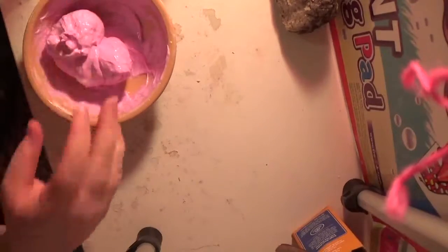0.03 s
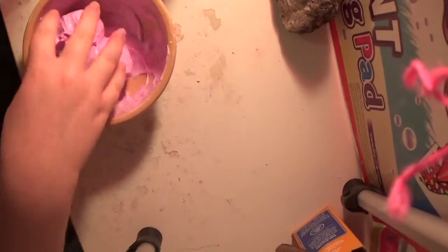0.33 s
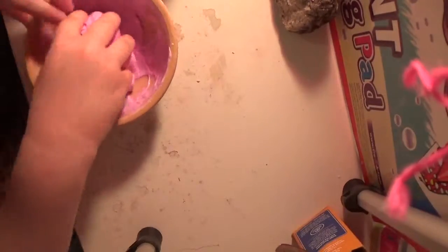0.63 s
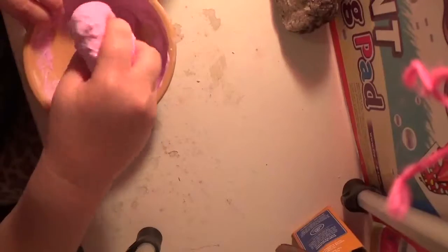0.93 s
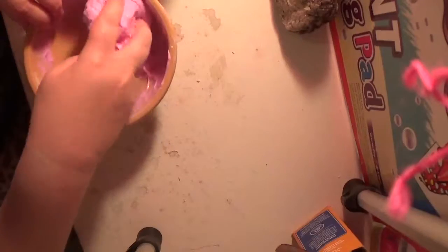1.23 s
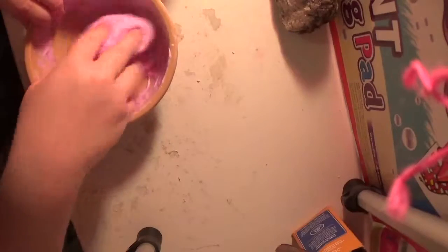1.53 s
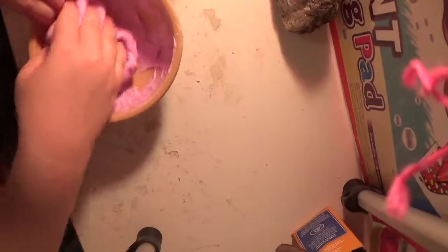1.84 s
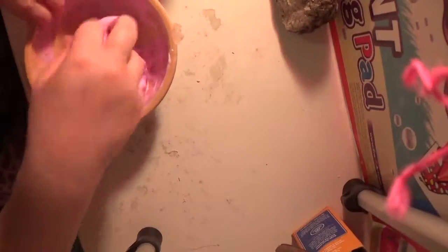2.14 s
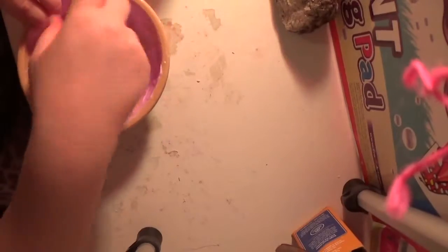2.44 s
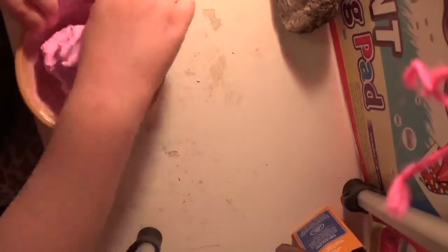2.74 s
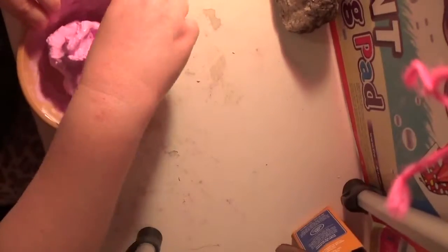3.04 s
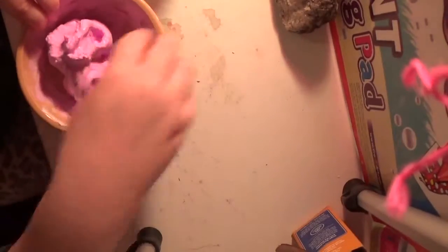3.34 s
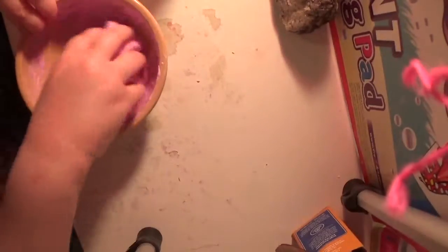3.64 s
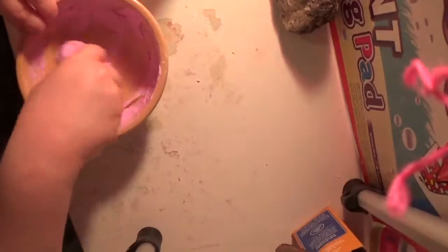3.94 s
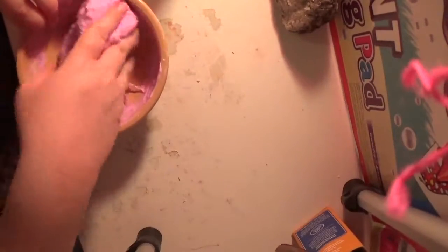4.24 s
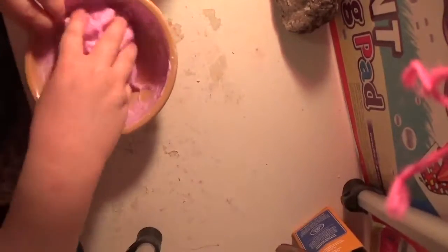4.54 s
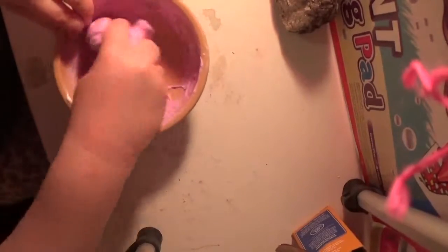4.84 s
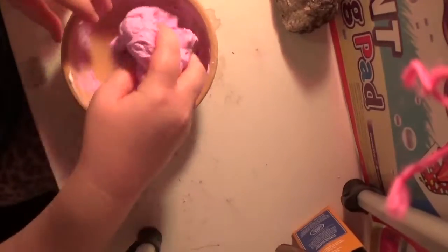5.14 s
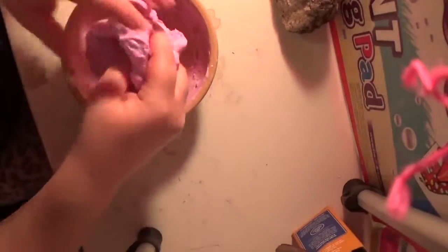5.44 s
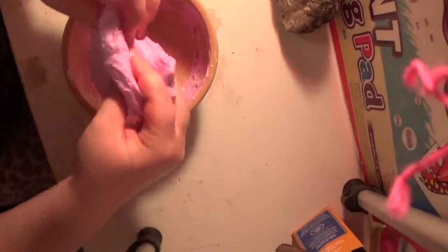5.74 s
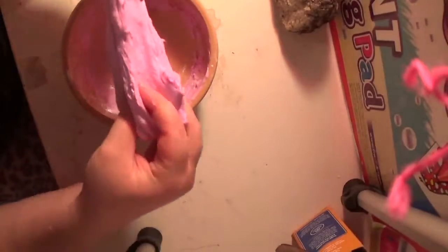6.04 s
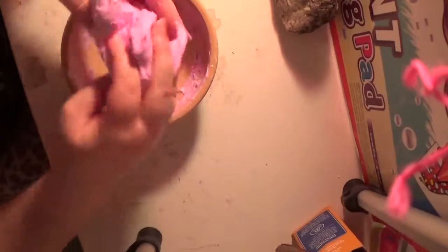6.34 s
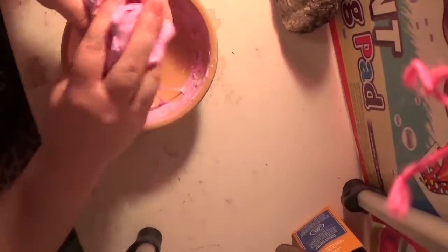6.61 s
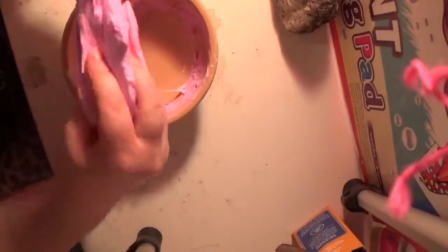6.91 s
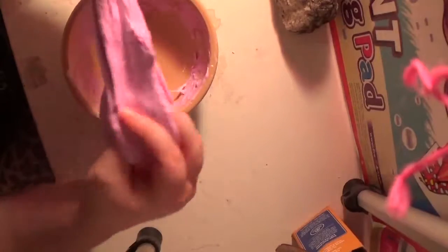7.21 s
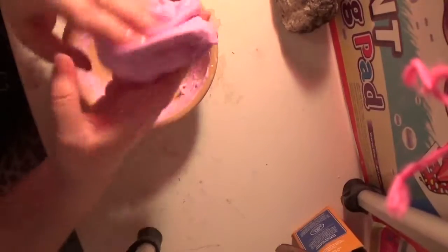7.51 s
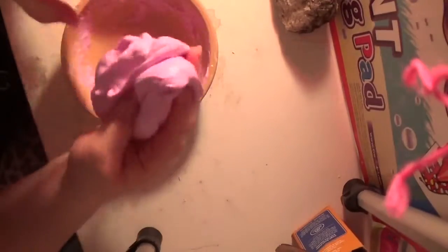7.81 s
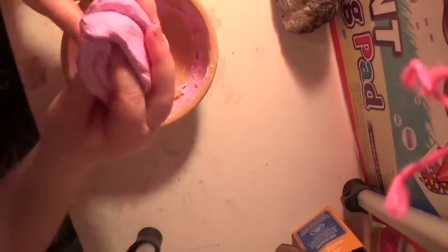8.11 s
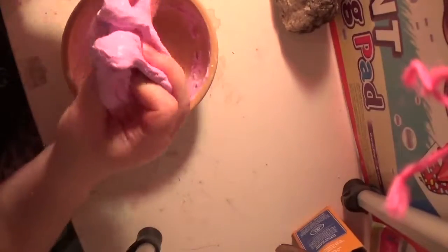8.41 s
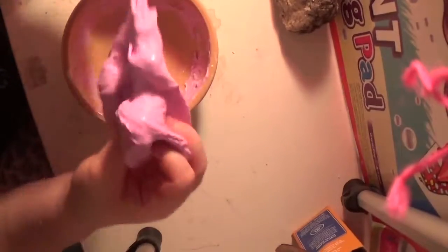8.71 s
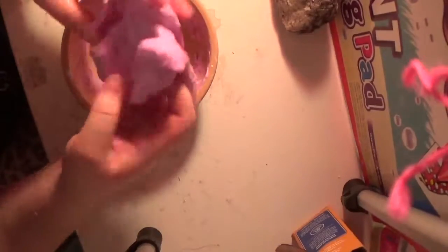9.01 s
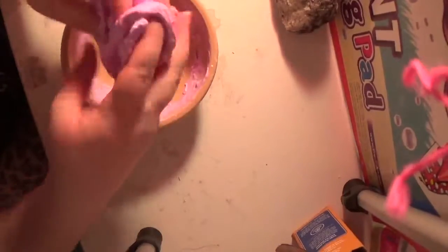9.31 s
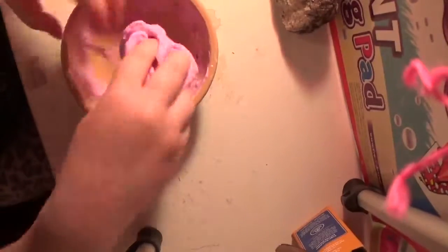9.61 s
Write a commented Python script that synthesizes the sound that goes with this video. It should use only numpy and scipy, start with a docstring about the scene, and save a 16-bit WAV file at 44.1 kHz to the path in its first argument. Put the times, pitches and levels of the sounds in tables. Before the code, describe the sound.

Close by in a small room, something hard clacks and rattles twice. A hand then kneads foamy slime in a wooden bowl, with soft fizzing, small bubble pops and brief squelches of air. The bowl knocks on the table, loudly near the start, and about halfway it drops with a short chatter. After that the slime is mostly pulled and folded, crackling and popping over a low appliance hum.

```python
"""A small room: a hand kneads foamy slime in a wooden bowl on a table, close by.
Tiny bubbles fizz and crackle as the slime is pressed and pulled, larger ones pop, trapped air squelches
out of folds and fingers smear along the wall. The bowl rocks and knocks on the table, ringing in its
modes; it drags once, and once drops and chatters. Something hard clacks and rattles twice at the start,
faint squeaks pass while the hand is nearly still, and an appliance hums underneath."""
import sys
import numpy as np
from scipy import signal
from scipy.fft import rfft, irfft
from scipy.io import wavfile
from scipy.ndimage import uniform_filter1d

SR = 44100
rng = np.random.default_rng(int(sys.argv[2]) if len(sys.argv) > 2 else 0)


def store_wav(level_fs):
    """Save 16-bit WAV to argv[1]."""
    pcm = np.round(np.clip(np.atleast_2d(level_fs), -1, 1) * 32767)
    wavfile.write(sys.argv[1], SR, pcm.T.astype(np.int16))


N = 430416
BINS_HZ = np.fft.rfftfreq(4096, 1 / SR)
AGE_S = np.arange(6144) / SR  # time axis of one short event


def gain(db):
    """Decibels to amplitude."""
    return 10 ** (np.asarray(db) / 20)


def unit_rms(x):
    """Scales to rms 1."""
    return x / np.sqrt(np.mean(x ** 2) + 1e-20)


def unit_crest(x):
    """Scales the loudest 2 ms to rms 1."""
    return x / np.sqrt(uniform_filter1d(x ** 2, size=88).max() + 1e-20)


def curve(points, hz=BINS_HZ):
    """Interpolates (f/Hz, value) points on a log-frequency axis."""
    points_hz, values = np.transpose(points)
    return np.interp(np.log(hz + 1), np.log(points_hz + 1), values)


def add(mix, start_s, sound):
    """Mixes a sound in at start_s."""
    part = mix[max(round(start_s * SR), 0):][:len(sound)]
    part += sound[:len(part)]


def colour(x, db):
    """Minimum-phase filter, one gain per bin of BINS_HZ."""
    cepstrum = irfft(np.log(gain(db)))
    cepstrum[1:len(BINS_HZ) - 1] *= 2
    cepstrum[len(BINS_HZ):] = 0
    return signal.oaconvolve(x, irfft(np.exp(rfft(cepstrum))))[:len(x)]


def noise(spectrum):
    """Noise of rms 1, shaped by (f/Hz, gain/dB) points."""
    return unit_rms(colour(rng.standard_normal(N), curve(spectrum)))


def drift(cutoff_hz):
    """Slow random wander of rms 1."""
    hop = 64
    steps = N // hop + 2
    lowpass = np.exp(-(np.fft.rfftfreq(steps, hop / SR) / cutoff_hz) ** 2)
    slow = irfft(rfft(rng.standard_normal(steps)) * lowpass, steps)
    return np.interp(np.arange(N) / hop, np.arange(steps), unit_rms(slow))


def impulses(samples, per_s):
    """Unit impulses at random times."""
    return rng.random(samples) < per_s / SR


def burst(decay_s, scatter):
    """A click with a dying scatter of smaller ones."""
    x = scatter * rng.standard_normal(len(AGE_S)) * np.exp(-AGE_S / decay_s)
    x[0] += 1
    return x


# room decay: f/Hz, t60/s
ROOM_T60 = [(200, 0.26), (600, 0.24), (1800, 0.25), (4500, 0.24), (11000, 0.13)]

def room(x, early_db, tail_db, pan_db):
    """Stereo sum of direct sound, treble scattered by nearby things and a short tail."""
    hz, t, spectra = signal.stft(rng.standard_normal((2, SR // 2)), SR, nperseg=256)
    decay = gain(-60 * t / curve(ROOM_T60, hz)[:, None])
    tail = signal.istft(spectra * decay, SR, nperseg=256)[1]
    age_s = np.arange(tail.shape[1]) / SR
    tail *= np.clip(age_s / 0.0073, 0, 1)
    early = rng.standard_normal(tail.shape) * np.exp(-age_s / 0.0054) * (age_s > .0005)
    early = signal.sosfilt(signal.butter(2, 900, "high", fs=SR, output="sos"), early)
    response = sum(gain(db) * part / np.linalg.norm(part, axis=1, keepdims=True)
                   for db, part in ((early_db, early), (tail_db, tail)))
    reflected = signal.oaconvolve(x[None], response, axes=1)[:, :N]
    return (x + reflected) * gain([[pan_db / 2], [-pan_db / 2]])


# appliance partials: f/Hz, level/dB
HUM_PARTIALS = [(54.5, -48.5), (119.5, -53.5), (179, -63), (239, -95.5), (296, -68.5)]
# room noise shape: f/Hz, gain/dB
AIR_SPECTRUM = [(12, -32), (20, -4.5), (81, 8), (199, -10), (239, -18), (303, -20), (346, -43),
                (463, -22.5), (652, -31.5), (725, -28.5), (995, -36), (2570, -44), (5540, -51.5),
                (6320, -52.5), (11000, -56), (14300, -95), (22000, -120)]

def background():
    """A wavering appliance hum over low rumble and faint hiss."""
    t, hum = np.arange(N) / SR, np.zeros(N)
    for hz, level_db in HUM_PARTIALS:
        amplitude = np.sqrt(2) * gain(level_db + 2.25 * drift(2.7))
        hum += amplitude * np.sin(2 * np.pi * hz * t + 0.53 * drift(0.75))
    shared, left, right = (noise(AIR_SPECTRUM) for _ in range(3))
    side_db = curve([(60, -56), (130, -12), (400, 13.5), (3000, 26)])  # bass centred, treble wide
    air = shared + np.array([colour(left, side_db), colour(right, side_db)])
    rumble = noise([(30, -32), (50, 1.5), (80, -1.5), (105, -10), (150, -11), (220, -23), (600, -42)])
    return hum + gain(-55.5) * air + gain(-47.5) * rumble


def squeaks():
    """A faint, nearly regular run of tiny chirps, each at a slightly different pitch."""
    start_s, length_s, per_s = 2.85, .64, 30
    centre_hz, width_s, level_db = 2920, 0.0022, -58
    out, t = np.zeros(N), AGE_S[:512]
    envelope = np.exp(-(t / width_s - 2) ** 2)
    for k, (jitter, detune, offset_db) in enumerate(rng.standard_normal((40, 3))):
        delay_s = (k + 0.048 * jitter) / per_s
        if delay_s < length_s:
            chirp = np.sin(2 * np.pi * centre_hz * (1 + 0.082 * detune) * t) * envelope
            add(out, start_s + delay_s, gain(level_db + offset_db) * chirp)
    return out


# hard contacts: t/s, level/dB, tilt/(dB/octave), rattle hold/s, rattle/dB re contact before trim
CLACK_HITS = [(0.0802, -14.5, 4.5, 0.027, -12), (.12, -12.5, -4, 0.025, -17),
              (0.1384, -20, -9.5, .012, -19), (0.3337, -14, 2.5, 0.028, -11),
              (.371, -19, -1.5, 0.0083, -9.5), (0.3861, -17.5, 0, 0.037, -15.5),
              (.389, -17, 0, 0.0092, -13), (0.4184, -20.5, -4.5, 0.0097, -10)]
# resonances of the hard object: f/Hz, width/Hz, gain/dB
CLACK_RESONANCES = [(340, 66, -1), (546, 67, 3), (1000, 76, -8), (1710, 130, -2), (1980, 260, 0),
                    (2370, 280, 0), (2890, 260, -2), (3830, 130, -1.5), (4270, 440, 3), (5970, 330, -2),
                    (6900, 670, -8.5), (8100, 320, -12), (8890, 210, -2), (10500, 400, -17)]

def clacks():
    """A hard contact, then a dense buzz of rebounds through the same resonances."""
    out, rattle_trim_db = np.zeros(N), -1.5
    power = sum(gain(db) ** 2 / (1 + (2 * (BINS_HZ - hz) / width_hz) ** 2)
                for hz, width_hz, db in CLACK_RESONANCES)
    bass_cut = 1 + (260 / (BINS_HZ + 10)) ** 4
    body_db = 10 * np.log10(power / bass_cut)
    for start_s, level_db, tilt_db_per_octave, hold_s, rattle_db in CLACK_HITS:
        tone_db = body_db + tilt_db_per_octave * np.log2(np.maximum(BINS_HZ, 1500) / 1500)
        contact = unit_crest(colour(burst(decay_s=.002, scatter=.6), tone_db))
        rebounds = rng.choice([-1, 1], len(AGE_S)) * impulses(len(AGE_S), per_s=7000)
        rattle = unit_rms(colour(rebounds, tone_db)) * np.exp(-np.maximum(AGE_S - hold_s, 0) / 0.014)
        add(out, start_s, gain(level_db) * (contact + gain(rattle_db + rattle_trim_db) * rattle))
    return out


# course of the bowl's drag: t/s, slip rate/Hz, level/dB
DRAG_PATH = [(0.204, 240, -54), (0.21, 149, -31), (0.234, 132, -41.5), (.26, 160, -52)]

def bowl_drag():
    """The bowl sticks and slips on the table in a brief groan."""
    times_s, slip_hz, level_db = np.transpose(DRAG_PATH)
    out, t = np.zeros(N), np.arange(times_s[0], times_s[-1], 1 / SR)
    phase = 2 * np.pi * np.cumsum(np.interp(t, times_s, slip_hz)) / SR
    tone = sum(gain(-7 * k) * np.sin((k + 1) * phase) for k in range(4))
    add(out, times_s[0], unit_rms(tone) * gain(np.interp(t, times_s, level_db)))
    return out


# landings of the dropped bowl: t/s, level/dB
LANDINGS = [(5.159, -15), (5.191, -17)]
# rim on the table: f/Hz, gain/dB
RIM_SPECTRUM = [(150, -23.5), (240, -2), (295, 2.5), (380, -6), (580, -0.5), (740, -12), (1000, -9.5),
                (1450, -11.5), (1750, -17.5), (2400, -29), (3800, -28.5), (4600, -39), (11000, -61)]

def bowl_chatter():
    """The dropped bowl lands twice; each time its rim rebounds quickly and unevenly."""
    power, fall_db_per_s = np.zeros(N), 260
    for start_s, level_db in LANDINGS:
        add(power, start_s, gain(level_db - fall_db_per_s * AGE_S) ** 2)
    rebounds = rng.choice([-1, 1], N) * impulses(N, per_s=1500)
    return unit_rms(colour(rebounds, curve(RIM_SPECTRUM))) * np.sqrt(power)


# bowl knocks: t/s, level/dB, upper modes/dB rel, tick/dB rel; modes are then shaped by wood_db
BOWL_KNOCKS = [(0.257, -26, -6, -12.5), (0.938, -6.5, -10, -36), (0.956, -11.5, -2, -48),
               (1.607, -15.5, -17, -34), (1.67, -22, -7.5, -32.5), (1.691, -16, -25, -29),
               (2.03, -25.5, -18, -22), (2.08, -27, -23, -13.5), (2.184, -27.5, -21, -31.5),
               (2.273, -20, -11.5, -38), (2.687, -30, -10, -24), (2.834, -35, -19, -28.5),
               (3.344, -22.5, -18, -33), (3.516, -31.5, -11, -14), (3.598, -25.5, -11, -29),
               (3.831, -36.5, -9, -17), (4.185, -29.5, -26, -5), (4.541, -12, -16, -4),
               (4.548, -22, -2, -11), (5.158, -14, 0, -21), (5.165, -6.5, -32, -23), (5.189, -9, -2, -29),
               (5.407, -36, 10, -23), (5.561, -33.5, -28, -32), (5.621, -31, -8, -26.5),
               (6.68, -30.5, -15, -11.5), (6.804, -36, -6, -9), (7.515, -34.5, -7, -27.5),
               (9.702, -35, -15, -23)]
# modes of the bowl on the table: f/Hz, gain/dB, t60/s
BOWL_MODES = [(230, -13, 0.096), (301.6, 0, 0.053), (350.5, -11, 0.11), (413, -1, 0.02), (483, 7, 0.04),
              (578.6, -7, 0.16), (758, -18, 0.098), (849, 7.5, 0.044), (1034, 2, 0.065), (1163, 7, 0.017),
              (1164, -1, 0.063), (1350, -8, 0.11), (1735, -1, 0.033), (2140, -24, .035)]
# contact tick: f/Hz, gain/dB
TICK_SPECTRUM = [(1500, -48), (2700, 4), (3800, -1), (4700, 5), (5800, 16.5), (7500, 5.5), (10000, 8),
                 (12000, -24.5)]

def bowl_knocks():
    """The bowl tips and lands: its modes ring and the contact ticks."""
    out = np.zeros(N)
    hz, mode_db, t60_s = np.transpose(BOWL_MODES)[:, :, None]
    is_upper = hz >= 800
    wood_db = curve([(80, -13), (180, -22.5), (260, 2), (1600, -10), (2800, -11), (8000, -60)])
    for start_s, level_db, upper_db, tick_db in BOWL_KNOCKS:
        # hand and slime load the bowl differently each time
        detune, load = rng.standard_normal((2, len(BOWL_MODES), 1))
        envelopes = gain(mode_db + 4.9 * load - 60 * AGE_S / t60_s)
        modes = -envelopes * np.sin(2 * np.pi * hz * (1 + 0.012 * detune) * AGE_S)
        lower = unit_crest((modes * ~is_upper).sum(0))
        upper = unit_crest((modes * is_upper).sum(0))
        wood = colour(lower + gain(upper_db) * upper, wood_db)
        tick = unit_crest(colour(burst(decay_s=0.0021, scatter=0.16), curve(TICK_SPECTRUM)))
        add(out, start_s, gain(level_db) * (wood + gain(tick_db) * tick))
    return out


def stroke(start_s, length_s, mid_db, growth_db):
    """Envelope of one hand movement: takes hold, grows or wanes, lets go."""
    attack_s, release_s = 0.035, .028
    t = np.arange(N) / SR - start_s
    live = (t > 0) & (t < length_s + .3)
    out, t = np.zeros(N), t[live]
    held = gain(mid_db + growth_db * (np.minimum(t / length_s, 1) - .5))
    out[live] = np.minimum(t / attack_s, 1) * held * np.exp(-np.maximum(t - length_s, 0) / release_s)
    return out


# fingers along the bowl wall: t/s, length/s, gap f/Hz, level/dB, growth/dB
FINGER_SMEARS = [(0.66, .2, 2030, -59, -2), (1.773, 0.28, 1980, -57, 2), (2.14, 0.15, 2060, -60.5, 3),
                 (3.9, 0.25, 2030, -52.5, 2)]

def smears():
    """Small slips of wet slime excite the narrow, shifting gap between fingers and bowl."""
    out, width_hz = np.zeros(N), 340
    wander = 1 + .04 * drift(6.8)
    slips = rng.standard_normal(N) * impulses(N, per_s=1500)
    pole = np.exp(-np.pi * width_hz / SR)
    for start_s, length_s, gap_hz, level_db, growth_db in FINGER_SMEARS:
        # moving resonance: shift down, low-pass, shift back
        carrier = np.exp(2j * np.pi * np.cumsum(gap_hz * wander) / SR)
        gap = (carrier * signal.lfilter([1], np.poly([pole, pole]), slips / carrier)).real
        out += unit_rms(gap) * stroke(start_s, length_s, level_db, growth_db)
    return out


# air escapes: peak t/s, level/dB, rise/s, fall/s, fold f/Hz, fold/dB re hiss
AIR_ESCAPES = [(2.764, -36.5, 0.0024, 0.0065, 5600, 4.5), (2.78, -36, 0.0016, .005, 5400, -4),
               (4.692, -26.5, .004, 0.019, 6200, -8.5), (6.754, -45, 0.0057, 0.0079, 8600, -12),
               (7.743, -34.5, 0.0028, 0.0043, 4000, -1), (8.655, -33.5, 0.0085, 0.0059, 3820, -2)]

def squelches():
    """Trapped air rushes out in tiny bubbles and rings the narrow fold it leaves by."""
    out, t = np.zeros(N), np.arange(-.06, .16, 1 / SR)
    hiss_db = curve([(300, -11), (1000, -3), (3000, -4), (6000, 13.5), (9500, 18.5), (11000, 6)])
    for peak_s, level_db, rise_s, fall_s, fold_hz, fold_db in AIR_ESCAPES:
        spray = rng.standard_normal(len(t)) * impulses(len(t), per_s=5000)
        hiss = unit_rms(colour(spray, hiss_db))
        fold = unit_rms(colour(spray, -20 * np.log10(1 + ((BINS_HZ - fold_hz) / 650) ** 2)))
        envelope = np.exp(-np.maximum(-t / rise_s, t / fall_s))
        add(out, peak_s + t[0], gain(level_db) * (hiss + gain(fold_db) * fold) * envelope)
    return out


def pop(ring_db, pocket_hz, snap_db):
    """A bubble's skin snaps and the opened pocket rings for a few cycles."""
    pocket_q = 2.05
    pocket_db = -10 * np.log10(1 + (pocket_q * (BINS_HZ / pocket_hz - pocket_hz / (BINS_HZ + 1))) ** 2)
    pocket_db += curve([(200, -46), (600, 3.5), (1100, 5), (4000, 2.5), (6000, 1), (11000, -9)])
    tear = burst(decay_s=.0014, scatter=.2)
    ring = colour(tear, pocket_db)
    snap = colour(tear, curve([(1000, -3), (3000, -34.5), (5000, 0.5), (10500, -4.5)]))
    return gain(ring_db) * unit_crest(ring) + gain(snap_db) * unit_crest(snap)


# large bubbles: t/s, ring/dB, pocket f/Hz, snap/dB
LARGE_BUBBLES = [(0.258, -34.5, 980, -48), (0.729, -36.5, 3700, -53), (1.033, -58, 1180, -32.5),
                 (1.063, -53, 939, -37.5), (1.593, -26.5, 4300, -27), (1.708, -37.5, 3700, -35),
                 (1.875, -49, 1390, -35), (2.078, -34, 2020, -40), (2.112, -42.5, 1720, -40),
                 (2.372, -45, 1210, -46), (2.473, -62, 910, -43.5), (3.496, -46, 1760, -38),
                 (3.937, -30.5, 2320, -53), (4.109, -40, 2000, -30), (4.207, -37.5, 1540, -46.5),
                 (4.825, -32, 1610, -47), (4.879, -36.5, 1500, -37), (4.94, -32.5, 1770, -40),
                 (4.977, -35.5, 1030, -52), (5.404, -20.5, 2420, -36), (5.653, -42, 3330, -33),
                 (5.942, -43, 4130, -48), (6.112, -37, 3880, -42), (6.68, -27, 2960, -27.5),
                 (6.758, -38.5, 923, -25.5), (6.804, -28, 2160, -26.5), (6.866, -27, 3860, -47),
                 (6.881, -36, 3800, -30.5), (7.13, -38.5, 3040, -37), (7.709, -28, 2660, -28.5),
                 (7.851, -36, 905, -56), (7.933, -39.5, 1550, -48), (7.975, -36.5, 2170, -27.5),
                 (8.045, -44, 1840, -49.5), (8.121, -35.5, 1170, -43.5), (8.228, -40.5, 2480, -32.5),
                 (8.256, -35, 4800, -46.5), (8.32, -42, 4630, -38), (9.146, -63, 902, -35),
                 (9.392, -44, 4370, -31.5), (9.661, -43, 3540, -52), (9.739, -28, 2570, -54)]

def pops(fizz_gain):
    """Large bubbles burst on cue; small ones by chance, oftener and harder where the slime is worked."""
    small_per_s, low_hz, high_hz, spread_db = 22, 1600, 5040, 6.5
    out = np.zeros(N)
    for start_s, *bubble in LARGE_BUBBLES:
        add(out, start_s, pop(*bubble))
    work = np.cumsum(np.sqrt(fizz_gain))
    for when, pitch, ring, snap in rng.random((round(small_per_s * N / SR), 4)):
        at = np.searchsorted(work, when * work[-1])
        pocket_hz = low_hz * (high_hz / low_hz) ** pitch
        ring_rel_db = 5.5 + spread_db * (2 * ring - 1)
        snap_rel_db = 9.5 + spread_db * (2 * snap - 1)
        add(out, at / SR, fizz_gain[at] * pop(ring_rel_db, pocket_hz, snap_rel_db))
    return out


# lump pressed against the bowl: t/s, length/s, level/dB, growth/dB, rub/dB rel
PRESS_STROKES = [(0.197, .27, -57, 3, 9), (0.478, .14, -61, -4, 0.5), (0.613, .25, -51.5, -6, 1),
                 (0.887, .16, -59, -2, -3), (1.13, .13, -52.5, -2.5, -1.5), (1.292, .28, -62, 2, -3.5),
                 (1.575, .15, -50, -2, 5), (1.747, .105, -46, 0, -6.5), (1.915, .04, -47, 0, -8),
                 (2.01, .16, -55, -4, -1.5), (2.18, .11, -56, 1, 2), (2.355, .05, -58, 0, 4.5),
                 (2.49, .13, -69, 7, 4), (2.62, .17, -53, 2.5, 1.5), (3.479, .23, -51.5, -2, -2),
                 (3.72, .125, -46.5, 1.5, -7.5), (3.873, .22, -49.5, -1, -8), (4.105, 0.079, -40, 4, -16),
                 (4.192, .08, -52, -4, 0), (4.293, .15, -59.5, -2, -7), (4.44, .21, -51, 5, 4),
                 (4.645, .11, -42, 2, 2), (4.754, .135, -46, -4.5, -1), (4.921, .15, -56, -1.5, -1.5),
                 (5.083, .13, -48, 1.5, -3.5), (5.311, .27, -58, -3, 1.5), (5.592, .14, -55, -1, 0.5)]
# lump stretched clear of the bowl: t/s, length/s, level/dB, growth/dB
PULL_STROKES = [(2.818, .27, -56, -5), (5.771, .29, -57.5, 1.5), (6.18, .21, -55.5, -5),
                (6.438, .21, -58, 4), (6.653, .23, -52, 1), (6.928, .25, -55, 2), (7.285, .33, -54.5, -6.5),
                (7.644, .095, -49.5, 7), (7.893, .3, -62, 0.5), (8.18, .37, -57, 2),
                (8.551, .135, -48.5, 2.5), (8.723, .14, -60, -5), (8.916, .03, -51, 1),
                (9.075, .03, -51, 0), (9.195, .06, -55, 1), (9.329, .12, -53.5, 0), (9.46, .3, -52, -1)]

def kneading():
    """Presses and pulls set the gains of fizz, crackle and rub; between them the foam keeps settling."""
    rest_foam_db, rest_rub_db = -72.5, -63.5
    press_crackle_db, pull_crackle_db, crackle_limit_db = -6.5, -9, -50
    press_power, rub_power = np.zeros((2, N))
    for *movement, rub_db in PRESS_STROKES:
        power = stroke(*movement) ** 2
        press_power += power
        rub_power += power * gain(rub_db) ** 2
    pull_power = sum(stroke(*movement) ** 2 for movement in PULL_STROKES)
    rest_power = gain(rest_foam_db) ** 2
    fizz = np.sqrt(press_power + pull_power + rest_power)
    crackle = np.sqrt(gain(press_crackle_db) ** 2 * press_power
                      + gain(pull_crackle_db) ** 2 * pull_power + rest_power)
    crackle /= np.hypot(1, crackle / gain(crackle_limit_db))  # larger bubbles run out in hard strokes
    rub = np.sqrt(rub_power + gain(rest_rub_db) ** 2)
    uneven_grip = gain(0.76 * drift(12))
    return np.array([fizz, crackle, rub]) * uneven_grip


def bubbles(per_s, spread_db, decay_cycles):
    """A dense crowd of tiny bursts of uneven size, each a brief ring at one of ten pitches."""
    out, t = np.zeros(N), AGE_S[:256]
    pitches_hz = np.geomspace(900, 11500, 10)
    for hz in pitches_hz:
        when, size, sign = rng.random((3, 16000))
        happens = np.arange(len(when)) < per_s * N / SR / len(pitches_hz)
        heights = happens * np.sign(sign - .5) * gain(spread_db * np.minimum(-np.log(1 - size), 4))
        train = np.bincount((when * N).astype(int), heights, N)
        ring = np.sqrt(hz) * unit_rms(np.sin(2 * np.pi * hz * t) * np.exp(-t * hz / decay_cycles))
        out += signal.oaconvolve(train, ring)[:N]
    return unit_rms(out)


def hollows(x, depth_db):
    """Hollows between hand, slime and bowl open and close, so narrow resonances come and go."""
    spectra = signal.stft(x, SR, nperseg=512)[2]
    patches = rng.standard_normal(spectra.shape)
    for _ in range(2):
        patches = uniform_filter1d(patches, size=4, axis=0)
        patches = uniform_filter1d(patches, size=12, axis=1)
    spectra *= gain(depth_db * unit_rms(patches))
    return unit_rms(signal.istft(spectra, SR, nperseg=512)[1][:N])


def threads():
    """Sticky threads let go of the skin in sparse, bright ticks."""
    releases = impulses(N, per_s=30) * gain(2.5 * np.minimum(rng.exponential(1, N), 3))
    snaps = signal.oaconvolve(releases, burst(decay_s=0.0012, scatter=0.072))[:N]
    return unit_rms(colour(snaps, curve([(500, -8), (2000, -14), (4000, 20), (11000, -16)])))


# fine bubbles, coarser bubbles, lump on the bowl; each: f/Hz, gain/dB
FIZZ_SPECTRUM = [(2060, -12), (3500, -3.5), (3750, -6), (4960, -3), (5790, -1), (6520, -1), (9330, 3),
                 (10900, -2), (11300, -64), (11500, -20), (15000, -64), (22000, -120)]
CRACKLE_SPECTRUM = [(500, -35), (900, -12.5), (1400, -1.5), (2050, 3.5), (2800, -3.5), (3700, -0.5),
                    (4600, -8), (7000, -24.5)]
RUB_SPECTRUM = [(130, -30.5), (230, -5), (310, 0.5), (400, -3), (550, -0.5), (750, -18), (1200, -12),
                (2500, -35)]

def slime(fizz_gain, crackle_gain, rub_gain):
    """Foam fizzes and crackles in clumps under the hand, the lump rubs the bowl and threads tick."""
    fine = bubbles(per_s=10000, spread_db=2.5, decay_cycles=0.59)
    fizz = hollows(colour(fine, curve(FIZZ_SPECTRUM)), depth_db=1.94)
    coarse = bubbles(per_s=4500, spread_db=4.5, decay_cycles=1.2)
    crackle = hollows(colour(coarse, curve(CRACKLE_SPECTRUM)), depth_db=3)
    rub = noise(RUB_SPECTRUM)
    ticks = gain(-13.5) * threads()
    clumps = gain(drift(63))
    return clumps * (fizz * fizz_gain + crackle * crackle_gain + rub * rub_gain) + ticks * fizz_gain


def scene():
    """All sources in the room, in stereo."""
    fizz_gain, crackle_gain, rub_gain = kneading()
    kneaded = slime(fizz_gain, crackle_gain, rub_gain) + smears() + squelches() + squeaks()
    return (room(kneaded, early_db=-13, tail_db=-11, pan_db=.1)
            + room(pops(fizz_gain), early_db=-3, tail_db=-11, pan_db=-0.6)
            + room(bowl_knocks() + bowl_drag(), early_db=-3.5, tail_db=-16, pan_db=-1)
            + room(bowl_chatter(), early_db=-1.5, tail_db=-8.5, pan_db=-0.5)
            + room(clacks(), early_db=-8.5, tail_db=-11.5, pan_db=-1)
            + background())


def record(dry):
    """The microphone rounds off the loudest peaks; a steep low-pass follows."""
    ceiling, cutoff_hz = .68, 11150
    rounded = dry / (1 + (dry / ceiling) ** 4) ** .25
    lowpass = signal.firwin(401, cutoff_hz, window=("kaiser", 8), fs=SR)
    return signal.oaconvolve(rounded, lowpass[None], "same")


dry = scene()
out = record(dry)
store_wav(out)
```